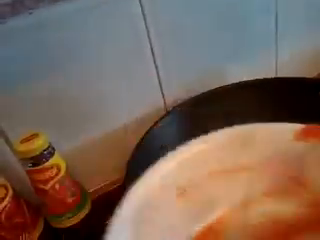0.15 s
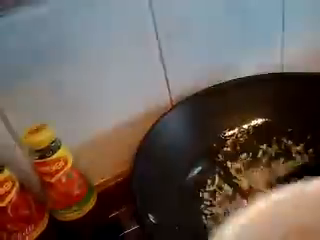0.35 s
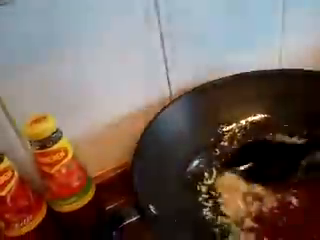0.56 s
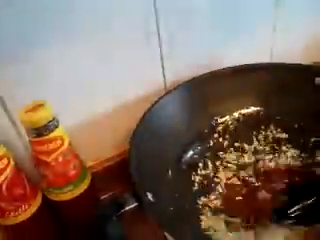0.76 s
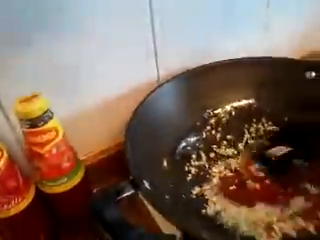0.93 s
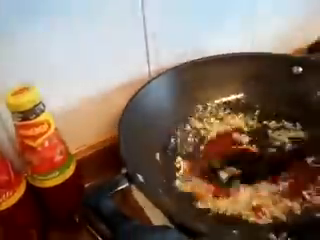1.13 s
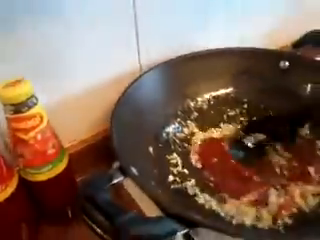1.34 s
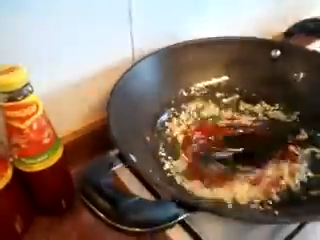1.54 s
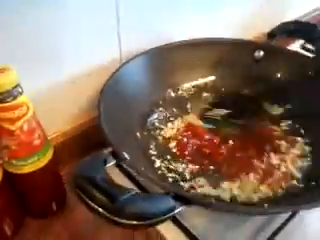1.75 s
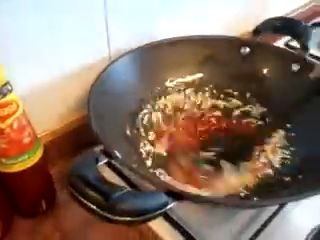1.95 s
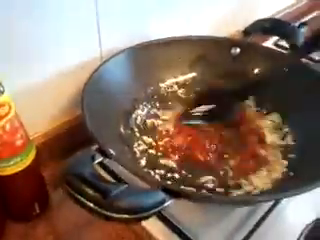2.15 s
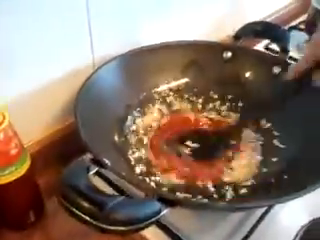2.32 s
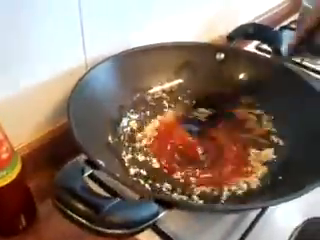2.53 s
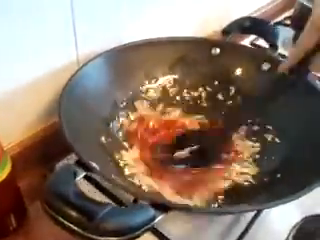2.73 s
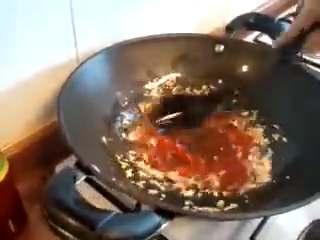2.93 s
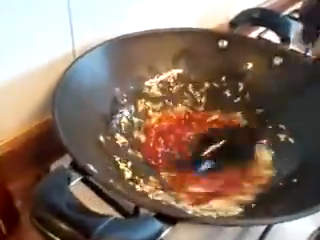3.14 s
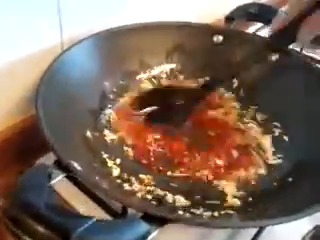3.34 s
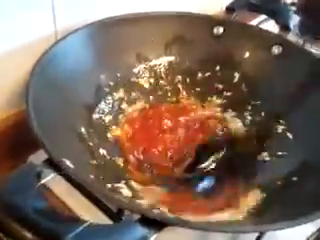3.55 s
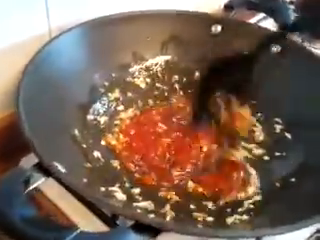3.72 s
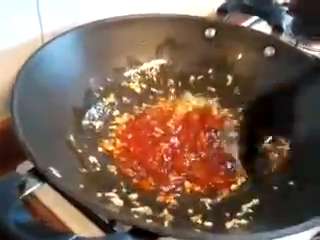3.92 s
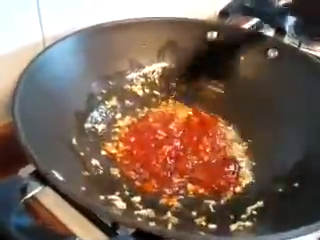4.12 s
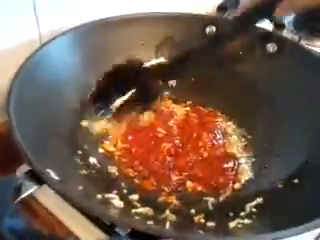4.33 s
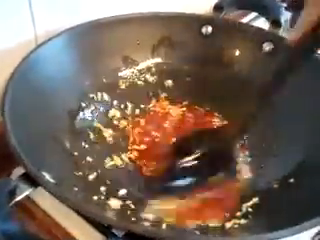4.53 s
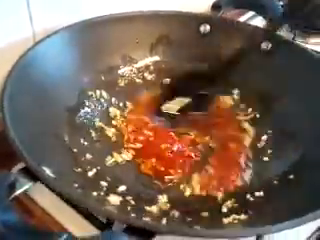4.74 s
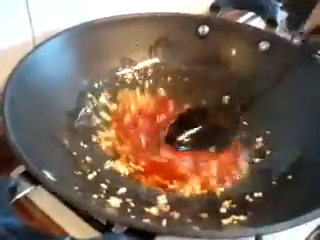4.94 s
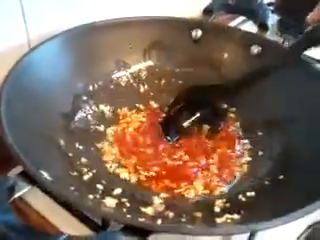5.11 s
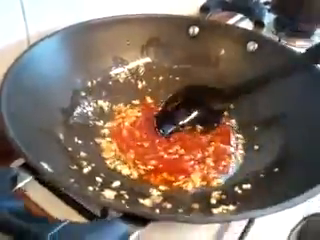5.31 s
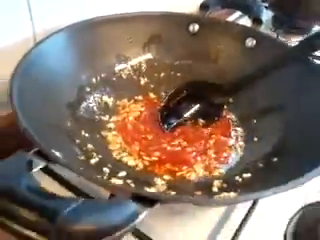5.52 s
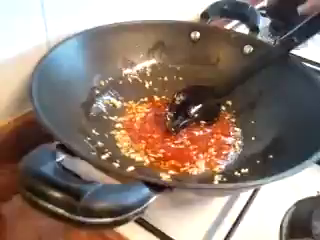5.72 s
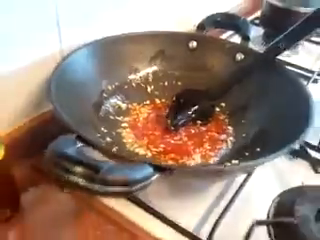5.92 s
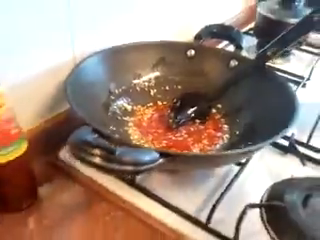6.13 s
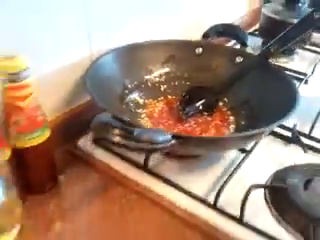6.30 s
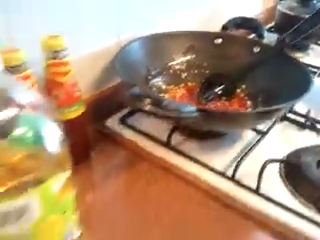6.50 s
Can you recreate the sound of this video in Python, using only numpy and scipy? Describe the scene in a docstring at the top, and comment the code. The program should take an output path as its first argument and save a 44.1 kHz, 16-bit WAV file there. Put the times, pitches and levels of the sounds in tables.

```python
"""A close, bright sizzle: garlic and tomato sauce fry in hot oil in a wok, in a small tiled kitchen.
Water flashing to steam makes thousands of tiny pops a second; larger bubbles ring lower in the sauce,
and single droplets snap. A spatula stirs: its friction and blows excite the modes of the pan, and wet
sauce flares up on bare metal. Then it is laid down and the frying dies back. Under it all lie the
rumble of the burner and a low machine hum; a far drone passes once."""
import sys
import numpy as np
from scipy import signal
from scipy.fft import rfft, irfft, next_fast_len
from scipy.io import wavfile
from scipy.ndimage import uniform_filter1d

SR = 44100
rng = np.random.default_rng(int(sys.argv[2]) if len(sys.argv) > 2 else 0)


def store_wav(level_fs):
    """Save 16-bit WAV to argv[1]."""
    pcm = np.round(np.clip(np.atleast_2d(level_fs), -1, 1) * 32767)
    wavfile.write(sys.argv[1], SR, pcm.T.astype(np.int16))


N = 293787
TIME = np.arange(N) / SR
SETTLED_DB, QUENCH_DB = -27, 5  # the frying once settled, and how far the cool sauce brings it down

# Spectra of steam pops, sauce bubbles, the blade's rub and the burner.
# Each row: frequency in Hz, relative gain in dB.
FIZZ_SPECTRUM = [(300, -22), (1450, -19.5), (3000, -8), (4000, -7), (4900, -2.5), (5700, -2.5), (7200, 0),
                 (7800, -1), (8300, -9), (8800, -27.5)]
SAUCE_SPECTRUM = [(200, -17.5), (450, -11), (900, -11), (1500, -5.5), (1690, 4), (1900, 5), (2400, 4),
                  (3200, 0), (4200, -4), (6500, -21.5)]
RUB_SPECTRUM = [(150, -17), (350, -9.5), (600, -8), (695, -2), (760, -7.5), (840, 2), (1000, 1),
                (1250, -1.5), (1450, -1), (1700, -0.5), (2100, -9.5), (4000, -46)]
BURNER_SPECTRUM = [(15, -11), (28, 14.5), (42, -6), (58, 6.5), (76, -3.5), (100, 3), (122, 2.5), (155, -4),
                   (220, -11.5), (450, -12), (1000, -23.5), (4000, -38.5)]
# Modes of the wok. Each row: frequency in Hz, relative level in dB, time to decay by 60 dB in seconds.
WOK_MODES = [(549, -15, .15), (695, 0, .12), (931, -9, .08), (1140, -9, .07), (1330, -13, .05),
             (2211, -14, .08), (4950, -6, .05)]
# Spatula strokes and one brief lull. Each row: midpoint and length in seconds, relative levels of dull
# rub and bare-metal ring in dB, surges of fizz and bubbling in dB (below 0 they dip).
STROKES_AND_LULL = [(0.096, 0.41, -36.5, -39, 2.5, 2), (0.338, 0.32, -39, -35.5, -1, 0),
                    (0.596, 0.34, -47, -42, -0.2, 3), (0.794, .3, -34, -38.5, 2.5, 2.5),
                    (1.209, 0.52, -43, -46, 2.5, 3), (1.489, .24, -33, -45, 4, 2),
                    (1.773, 0.26, -39.5, -39.5, 1, 1), (2.064, 0.16, -37, -46, -0.5, 2.5),
                    (2.306, .17, -33, -47, 1.5, 0.5), (2.774, 0.29, -39, -38, -.5, 2),
                    (3.005, 0.38, -45.5, -50, 2.5, 1), (3.277, 0.27, -42.5, -42, 0.7, 3),
                    (3.822, .4, -58, -57, 1.5, 2), (3.984, 0.23, -43, -39.5, 0, 2.5),
                    (4.2, .12, -56, -57, -3, -0.5), (4.363, 0.11, -40, -47, 0.2, 5),
                    (4.709, .24, -44, -48, .3, 1.7), (4.993, 0.38, -37, -56, -0.2, 1),
                    (5.236, .22, -57, -57, 0.2, 0)]
# Scrapes that push sauce onto hot metal.
# Each row: time of the peak in seconds, level in dB, width in seconds, centre in Hz, spread in octaves.
SAUCE_FLARES = [(0.397, -25.5, 0.015, 1707, 0.59), (0.57, -21.5, 0.0099, 2770, 0.19),
                (2.155, -28, 0.025, 3800, .16), (2.299, -19, 0.046, 6400, 0.97),
                (3.001, -29, 0.028, 2820, 0.2), (3.041, -20.5, 0.035, 5000, 0.71),
                (3.085, -20, 0.019, 5660, 0.55), (4.847, -24.5, .014, 3500, .07),
                (4.875, -30, 0.035, 4500, 0.65), (5.959, -34, 0.023, 2470, 0.6),
                (6.428, -43.5, 0.043, 1730, 0.26)]
# The largest droplets bursting in the oil. Each row: start in seconds, peak level in dB.
DROPLET_SPITS = [(0.7412, -4), (1.0272, -10), (1.542, -7), (1.6203, -3), (1.8655, -5), (4.23, -18),
                 (4.399, -14), (5.025, -10), (5.574, -21), (5.6236, -12), (5.878, -18), (5.898, -20)]
# The flat of the blade striking the pan. Each row: start in seconds, level in dB, centre in Hz,
# spread in octaves, ring of the pan in dB relative to the knock.
FLAT_KNOCKS = [(2.107, -21.5, 1200, 0.82, -13), (2.264, -27, 750, .31, -19),
               (4.2514, -20.5, 1450, 0.64, -3), (5.622, -20.5, 834, .45, -11), (5.824, -32, 353, 0.56, -22),
               (5.842, -29, 716, 0.26, -12), (6.017, -25, 425, .33, -26), (6.202, -30, 850, 0.27, -18),
               (6.217, -30.5, 646, 0.76, -19)]
# The blade's edge striking bare metal. Each row: start in seconds, level in dB, centre in Hz,
# spread in octaves, ring of the blade in dB relative to the tick.
EDGE_TICKS = [(2.306, -9, 6600, .15, -20), (2.321, -19, 6000, .7, -21), (2.898, -9, 7400, 0.3, -24),
              (3.073, -11.5, 3550, .75, -20), (4.2508, -10.5, 6700, .27, 1)]


def amp(db):
    """Decibels to amplitude ratio."""
    return 10 ** (np.asarray(db) / 20)


def unit_rms(x):
    """Normalisation to rms 1."""
    return x / np.sqrt(np.mean(x ** 2) + 1e-20)


def add(mix, start_s, sound):
    """Superposition: a sound joins the mix at start_s."""
    part = mix[max(round(start_s * SR), 0):][:len(sound)]
    part += sound[:len(part)]


def colour(x, spectrum, size=4096):
    """Minimum-phase filtering imposes a spectrum while clicks keep their sharp fronts."""
    hz, db = np.transpose(spectrum)
    bin_hz = abs(np.fft.fftfreq(size, 1 / SR)) + 1
    log_gain = np.log(amp(np.interp(np.log(bin_hz), np.log(hz), db)))
    response = np.fft.ifft(np.exp(np.conj(signal.hilbert(log_gain)))).real
    return signal.oaconvolve(x, response[:size // 2])[:len(x)]


def band(x, hz, octaves, top_hz=8150):
    """A Gaussian passband in log frequency, cut off above top_hz; the result has rms 1."""
    f = np.fft.rfftfreq(len(x), 1 / SR) + 1
    bell = np.exp(-.5 * (np.log2(f / hz) / octaves) ** 2)
    return unit_rms(irfft(rfft(x) * bell / (1 + (f / top_hz) ** 36), len(x)))


def wander(rate_hz):
    """Low-passed noise: a smooth random fluctuation of rms 1."""
    size = next_fast_len(N)
    lowpass = np.exp(-(np.fft.rfftfreq(size, 1 / SR) / rate_hz) ** 2)
    return unit_rms(irfft(rfft(rng.standard_normal(size)) * lowpass, size)[:N])


def impulses(per_s, spread_db=3):
    """A Poisson process of bursts or slips, spread in level."""
    size = amp(spread_db * np.minimum(rng.exponential(1, N), 5))
    return unit_rms(size * rng.choice([-1, 1], N) * (rng.random(N) < per_s / SR))


def bubble_rings(per_s, low_hz, high_hz, decay_cycles, sizes=32):
    """Each bubble is a damped oscillator whose size sets its pitch."""
    clicks = impulses(per_s)
    size = rng.integers(0, sizes, N)
    out = np.zeros(N)
    for k, hz in enumerate(np.linspace(low_hz, high_hz, sizes)):
        radius, angle = np.exp(-hz / SR / decay_cycles), 2 * np.pi * hz / SR
        feedback = [1, -2 * radius * np.cos(angle), radius * radius]
        out += signal.lfilter([np.sqrt(hz) * np.sin(angle)], feedback, clicks * (size == k) + 1e-18)
    return unit_rms(out)


def clusters(x, depth_db):
    """Spectral modulation: groups of like-sized bubbles come and go, briefly tinting the sound."""
    spectra = signal.stft(x, nperseg=512)[2]
    tint = uniform_filter1d(rng.standard_normal(spectra.shape), 5, axis=0)
    tint = unit_rms(uniform_filter1d(tint, 12, axis=1))
    return signal.istft(spectra * amp(depth_db * tint))[1][:N]


def heat_db(spread_at_s=1.96, spread_s=.27, rest_at_s=5.27, drop_db=6, drop_s=.18, fade_db_per_s=7.5):
    """Boiling relative to its settled level: cool sauce quenches it, and it fades once stirring stops."""
    fresh = 1 / (1 + np.exp((TIME - spread_at_s) / spread_s))
    rest_s = np.maximum(TIME - rest_at_s, 0)
    return QUENCH_DB * fresh - drop_db * (1 - np.exp(-rest_s / drop_s)) - fade_db_per_s * rest_s


def stir_curves():
    """Envelopes of friction gain and of surge in dB: a half cosine for each stroke and for the lull."""
    curves = np.zeros((4, N))
    for middle_s, length_s, rub_db, ring_db, fizz_db, sauce_db in STROKES_AND_LULL:
        during = abs(TIME - middle_s) < length_s / 2
        arch = np.cos(np.pi * (TIME[during] - middle_s) / length_s)
        curves[:, during] += np.outer([amp(rub_db), amp(ring_db), fizz_db, sauce_db], arch)
    return dict(zip(["rub", "ring", "fizz_db", "sauce_db"], curves))


def frying_db():
    """Evaporation follows the heat of the pan, with brief surges and dips."""
    return SETTLED_DB + heat_db() + stir_curves()["fizz_db"]


def fizz(peak_per_s=10000, floor_per_s=500, thinning=.9, flicker_db=.5, trim_db=.5):
    """Shot noise of water flashing to steam in oil; as the frying weakens the pops stand apart."""
    level_db = frying_db()
    per_s = floor_per_s + peak_per_s * amp(thinning * (level_db - level_db.max()))
    pops = impulses(per_s) + .35 * bubble_rings(per_s, low_hz=3500, high_hz=8540, decay_cycles=3.3)
    pops = colour(pops / np.sqrt(per_s), FIZZ_SPECTRUM)  # the division makes power independent of rate
    pops *= amp(flicker_db * wander(rate_hz=92))
    return unit_rms(clusters(pops, depth_db=.34)) * amp(level_db + trim_db)


def bubbling(per_s=4500, settled_db=-36, heat_share=.82, flicker_db=1):
    """Bubble resonance falls with size, so the larger, wetter bubbles of the sauce sound lower."""
    pops = impulses(per_s) + .22 * bubble_rings(per_s / 2, low_hz=1200, high_hz=4235, decay_cycles=5.1)
    pops = colour(pops, SAUCE_SPECTRUM) * amp(flicker_db * wander(rate_hz=33))
    level_db = settled_db + heat_share * heat_db() + stir_curves()["sauce_db"]
    return unit_rms(clusters(pops, depth_db=1.84)) * amp(level_db)


def crackle(per_s=70, frying_share=.95, offset_db=-22):
    """Sparse shot noise: stray droplets tick on the hot wall and fade a little less than the fizz."""
    pops = unit_rms(colour(impulses(per_s, spread_db=-1.5), FIZZ_SPECTRUM))
    return pops * amp(frying_share * frying_db() + offset_db)


def burner_rumble(level_db=-39.5):
    """The burner gives broadband noise with most of its power at low frequencies."""
    return amp(level_db) * unit_rms(colour(rng.standard_normal(N), BURNER_SPECTRUM, size=16384))


def machine_hum(hz=29.2, level_db=-41.5, waver_hz=.79, throb_db=.5):
    """A machine's low tone wavers under slight random frequency and amplitude modulation."""
    pitch_hz = hz + waver_hz * wander(rate_hz=3.7)
    tone = np.sin(2 * np.pi * np.cumsum(pitch_hz) / SR)
    return amp(level_db) * unit_rms(tone * amp(-throb_db * wander(rate_hz=9)))


def wok_ring(t):
    """The pan's impulse response is a sum of exponentially decaying modes."""
    return sum(amp(db - 60 * t / t60) * np.sin(2 * np.pi * hz * t) for hz, db, t60 in WOK_MODES)


def stirring(per_s=3500, modes_db=-14, idle_rub_db=-42, idle_ring_db=-48.5, heat_share=.44, trim_db=-1):
    """Stick-slip friction of garlic under the blade drives the wok's modes; bare metal rings hollow."""
    blade = stir_curves()
    shifting = amp(heat_share * heat_db())  # between strokes the garlic still shifts in the oil
    modes = unit_rms(signal.oaconvolve(impulses(per_s), wok_ring(TIME[:SR // 4]))[:N])
    rub = unit_rms(colour(impulses(per_s), RUB_SPECTRUM)) + amp(modes_db) * modes
    ring = band(impulses(per_s), hz=1140, octaves=.09)
    rub_gain = np.hypot(blade["rub"], amp(idle_rub_db) * shifting)
    ring_gain = np.hypot(blade["ring"], amp(idle_ring_db) * shifting)
    return amp(trim_db) * (rub * rub_gain + ring * ring_gain)


def flares(per_s=12000, rise_share=.4):
    """Flash boiling: a short rush of slips and pops as the blade drags wet sauce over dry metal."""
    out, t = np.zeros(N), TIME[:SR // 4] - 1 / 8
    for peak_s, db, width_s, hz, octaves in SAUCE_FLARES:
        side_s = width_s * np.where(t < 0, rise_share, 1 - rise_share)
        swell = np.exp(-.5 * (t / side_s) ** 2)
        rush = band(impulses(per_s, spread_db=2)[:len(t)], hz, octaves)
        add(out, peak_s + t[0], amp(db) * swell * rush)
    return out


def spits(t60=.003):
    """A bursting droplet is so brief that its spectrum is broad: a sharp snap."""
    out, t = np.zeros(N), TIME[:SR // 50]
    for start_s, db in DROPLET_SPITS:
        snap = colour(rng.standard_normal(len(t)) * amp(-60 * t / t60), FIZZ_SPECTRUM)
        add(out, start_s, amp(db) * snap / abs(snap).max())
    return out


def impact(t, hz, octaves, ring_db, t60, rise_s=.00033):
    """An impact gives a short clack of noise and the damped free vibration of the loaded pan."""
    clack = band(rng.standard_normal(len(t)), hz, octaves) * amp(-60 * t / t60)
    return (1 - np.exp(-t / rise_s)) * (clack + amp(ring_db) * wok_ring(t))


def knocks_and_ticks(blade_hz=4920, blade_t60=.023):
    """The flat of the blade knocks dully; its edge ticks brightly and excites the blade's own mode."""
    out, t = np.zeros(N), TIME[:SR // 4]
    blade_ring = amp(-60 * t / blade_t60) * np.sin(2 * np.pi * blade_hz * t)
    for start_s, db, hz, octaves, ring_db in FLAT_KNOCKS:
        add(out, start_s, amp(db) * impact(t, hz, octaves, ring_db, t60=.038))
    for start_s, db, hz, octaves, blade_db in EDGE_TICKS:
        tick = impact(t, hz, octaves, ring_db=-33, t60=.03)
        add(out, start_s, amp(db) * (tick + amp(blade_db) * blade_ring))
    return out


def far_drone(start_s=3.62, length_s=.27, hz=136.4, sag_hz=31.2, waver_hz=7, middle_db=-37, swell_db=13):
    """A quadratic glide: a far, low tone swells, sinks ever faster in pitch, and stops."""
    progress = np.clip((TIME - start_s) / length_s, 0, 1)
    pitch_hz = hz - sag_hz * progress ** 2 + waver_hz * wander(rate_hz=33)
    tone = unit_rms(np.sin(2 * np.pi * np.cumsum(pitch_hz) / SR))
    gate = np.minimum(np.minimum(progress, 1 - progress) * length_s / .035, 1)  # 35 ms ramps
    return tone * gate * amp(middle_db + swell_db * (progress - .5))


def kitchen(x, bowl_db, bowl_t60, room_db, spots, room_t60=.14, echoes_per_s=3000, hop=128):
    """Reverberation: quick reflections in the bowl, then a tail off the tiles, distinct for each spot."""
    t, out = TIME[:SR // 4], x.copy()
    spot = np.repeat(rng.integers(0, spots, N // hop + 1), hop)[:N]  # the sound hops about the pan
    for k in range(spots):
        taps = rng.choice([-1, 1], len(t)) * (rng.random(len(t)) < echoes_per_s / SR)
        bowl = taps * amp(-60 * t / bowl_t60) * (t > .0007)
        room = taps * amp(-60 * t / room_t60) * (t > .006)
        echoes = amp(bowl_db) * bowl / np.linalg.norm(bowl) + amp(room_db) * room / np.linalg.norm(room)
        share = np.sqrt(abs(uniform_filter1d(1. * (spot == k), hop)))  # equal-power crossfade
        out += signal.oaconvolve(x * share, echoes)[:N]
    return out / np.sqrt(1 + amp(bowl_db) ** 2 + amp(room_db) ** 2)


def scene():
    """The sources superpose; frying deep in the bowl carries more of its reflections than wall sounds."""
    in_bowl = fizz() + bubbling() + stirring() + flares()
    deep = kitchen(in_bowl, bowl_db=-6.5, bowl_t60=.043, room_db=-12, spots=20)
    on_wall = spits() + crackle() + knocks_and_ticks()
    near = kitchen(on_wall, bowl_db=-8.5, bowl_t60=.023, room_db=-9, spots=6)
    return (deep + near + burner_rumble() + machine_hum() + far_drone())[None]


def record(dry):
    """Band limiting: a steep low-pass filter removes the highest treble."""
    lowpass = signal.firwin(401, cutoff=8950, window=("kaiser", 9), fs=SR)
    return signal.oaconvolve(dry, lowpass[None], "same")


dry = scene()
out = record(dry)
store_wav(out)
```